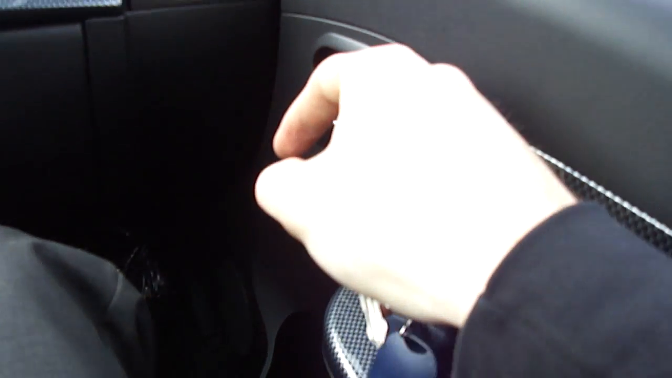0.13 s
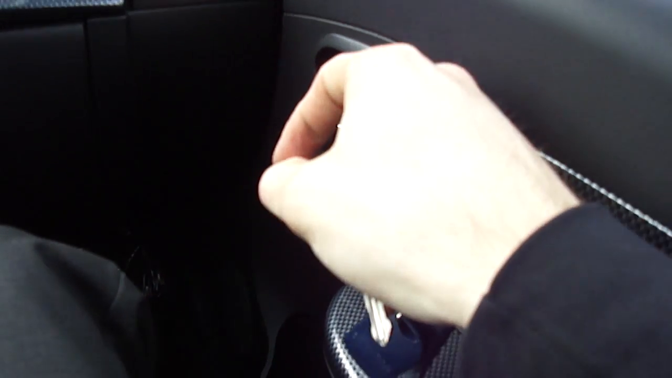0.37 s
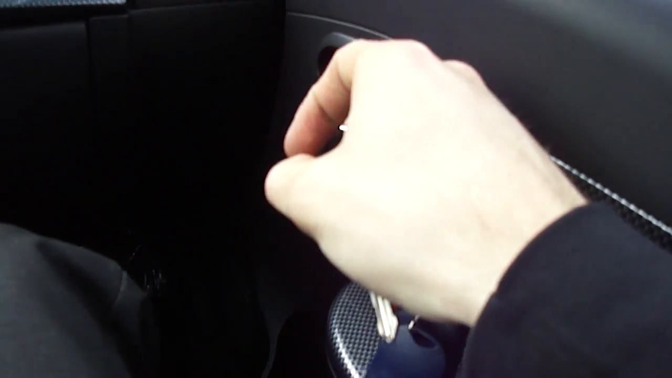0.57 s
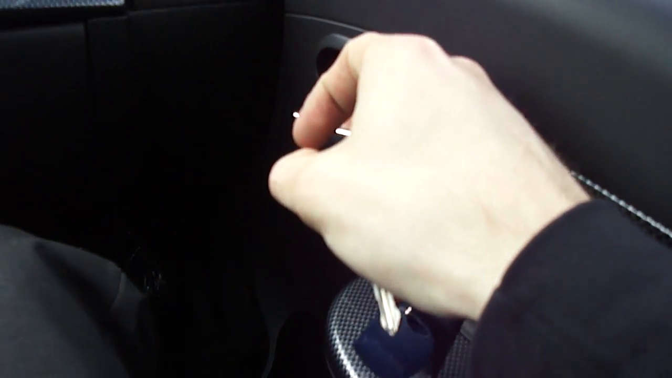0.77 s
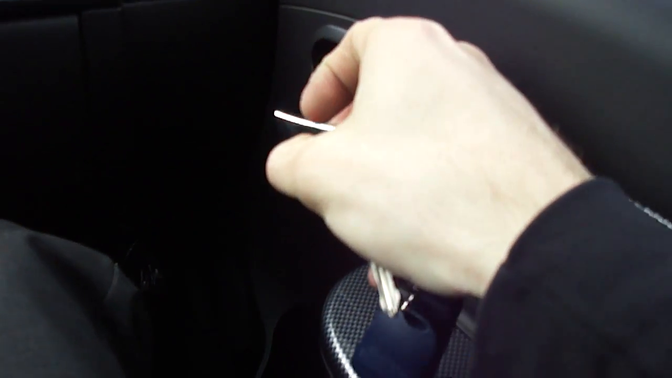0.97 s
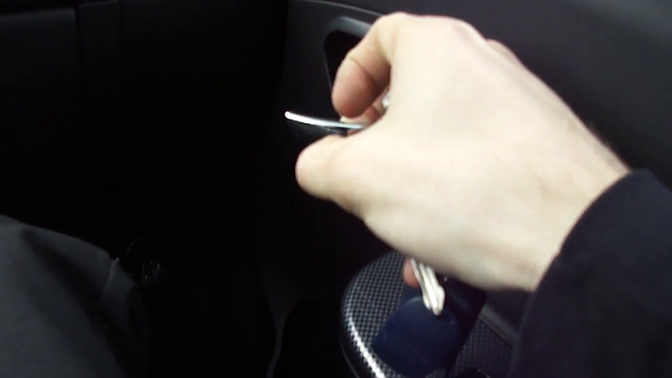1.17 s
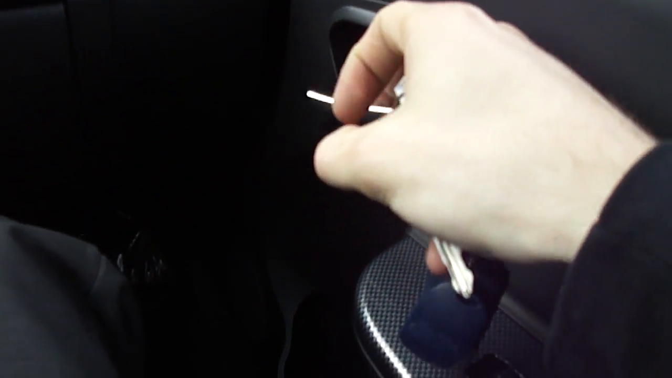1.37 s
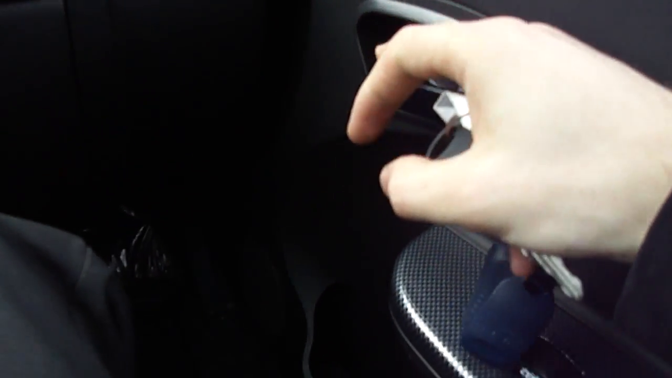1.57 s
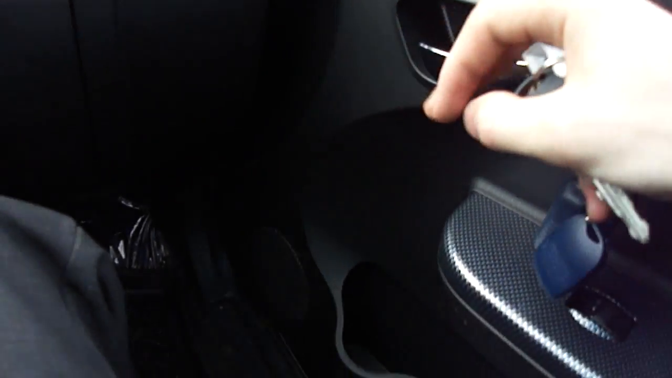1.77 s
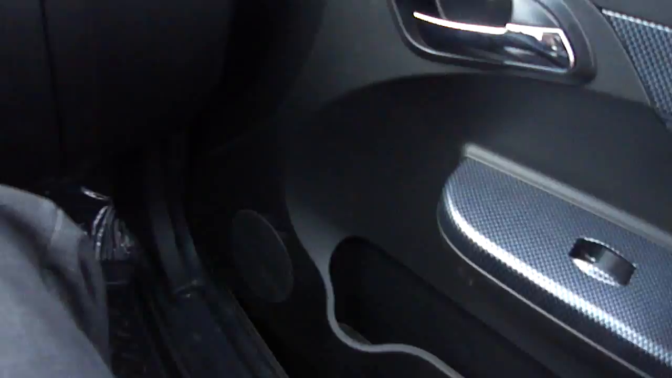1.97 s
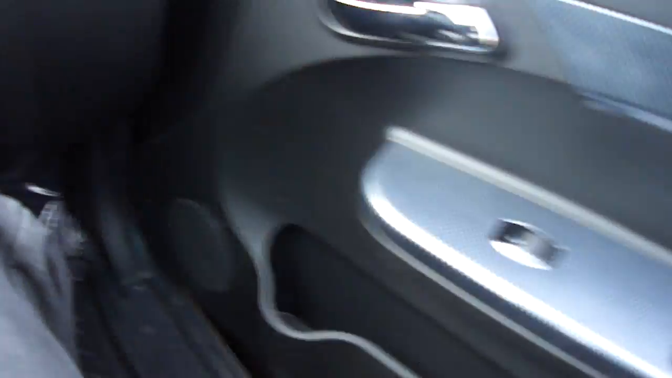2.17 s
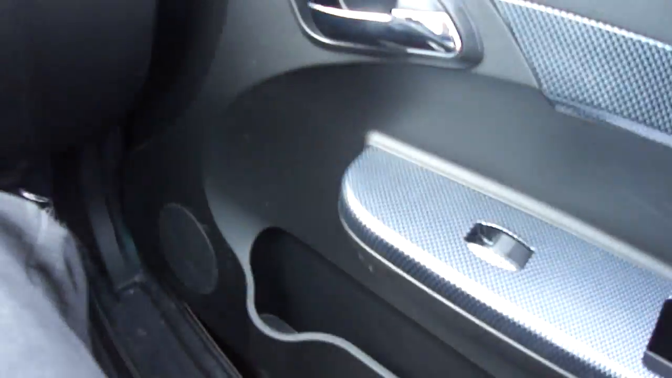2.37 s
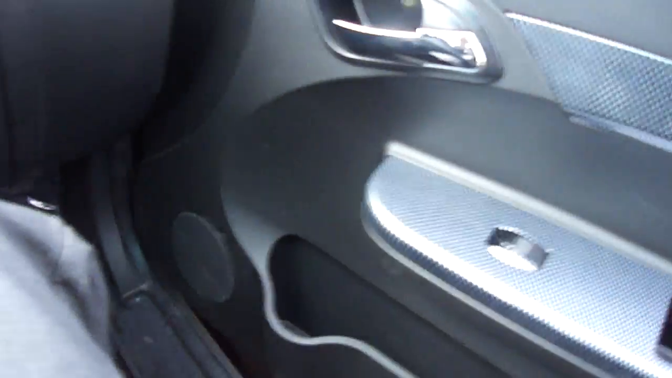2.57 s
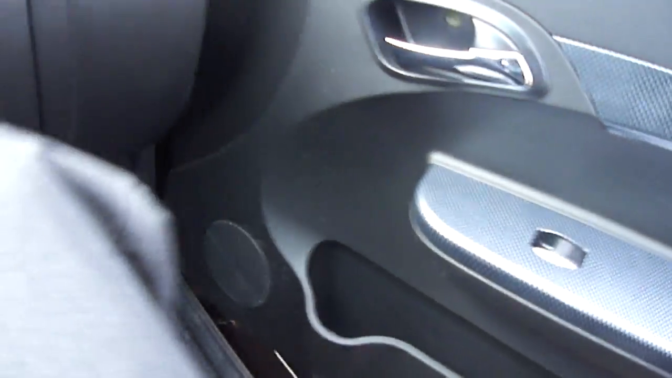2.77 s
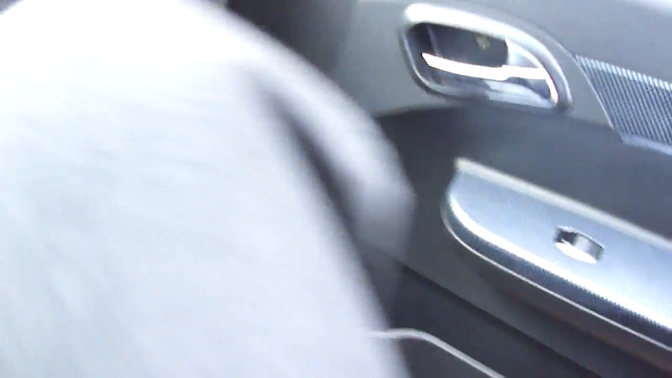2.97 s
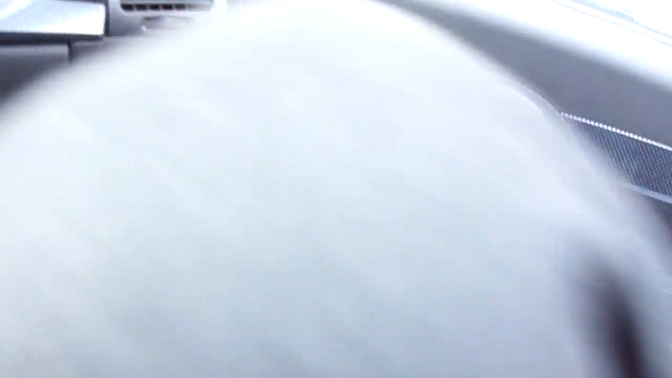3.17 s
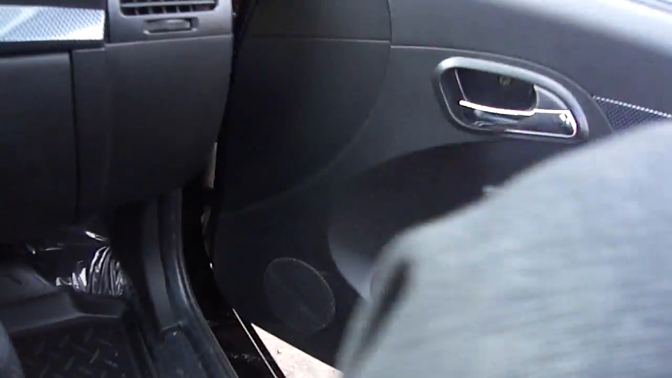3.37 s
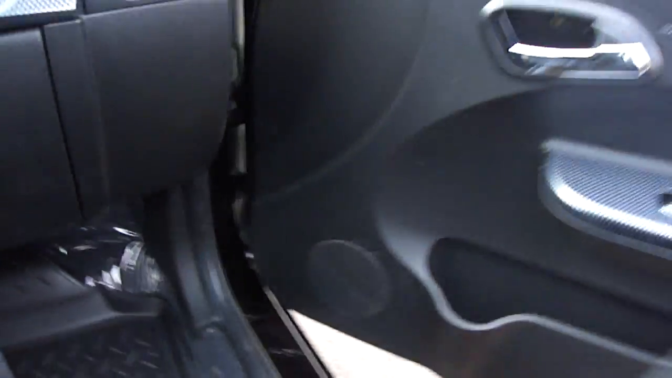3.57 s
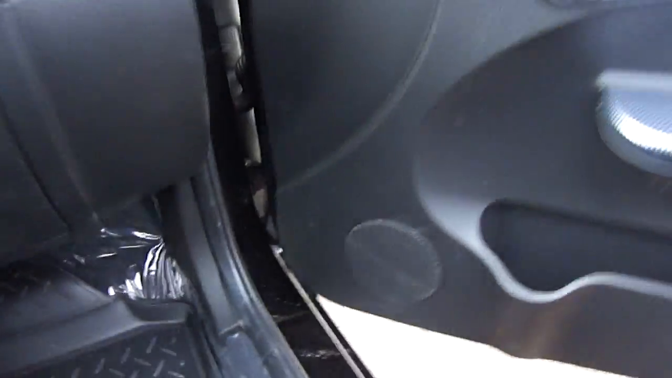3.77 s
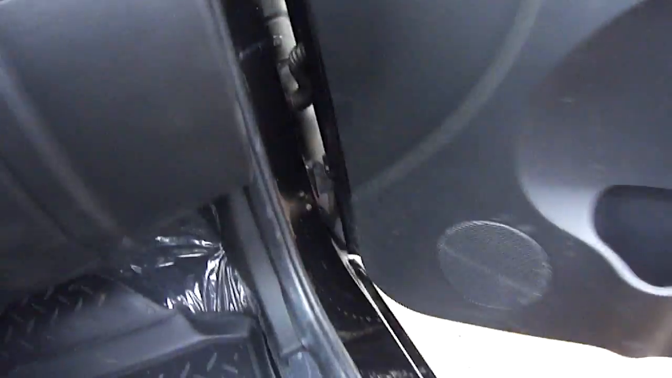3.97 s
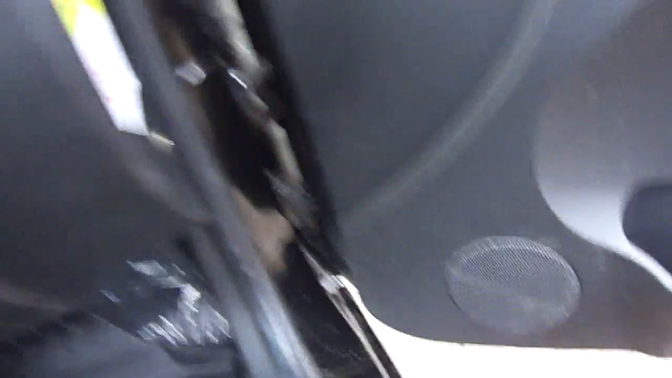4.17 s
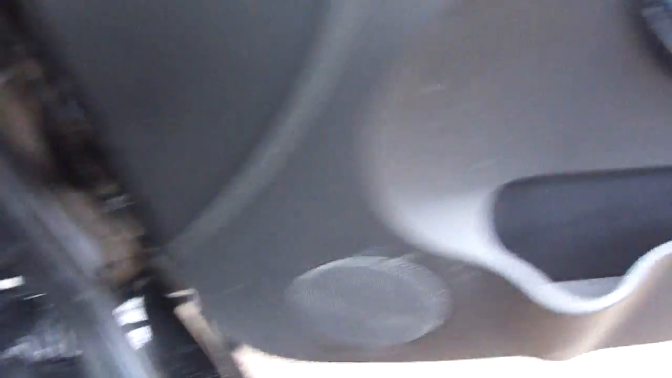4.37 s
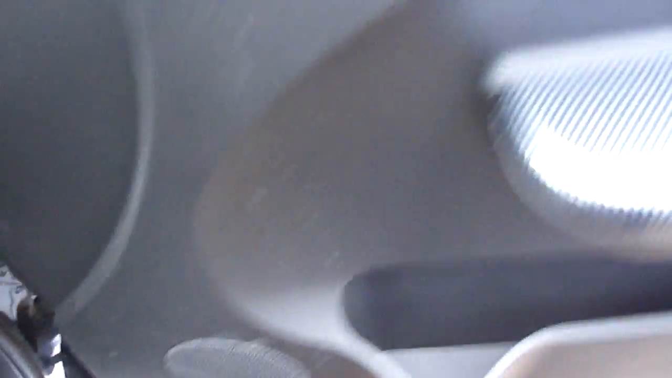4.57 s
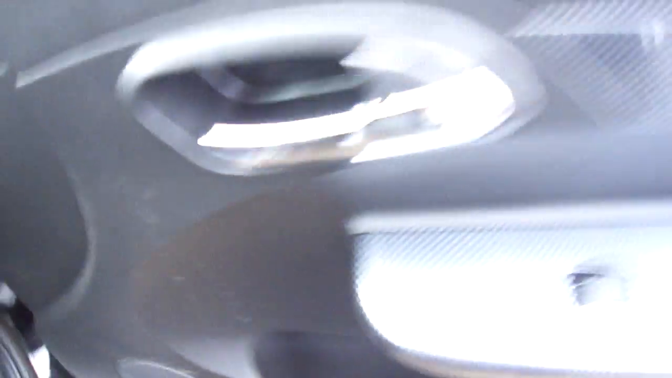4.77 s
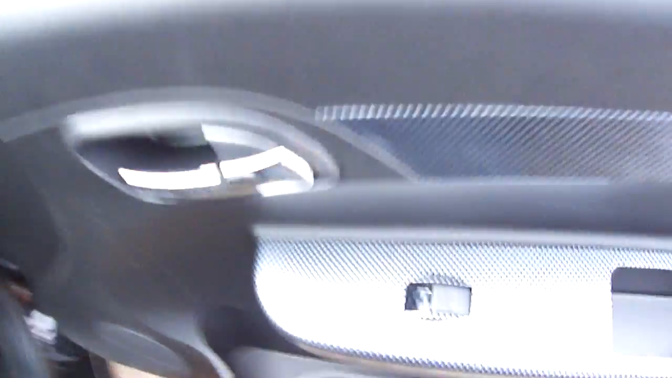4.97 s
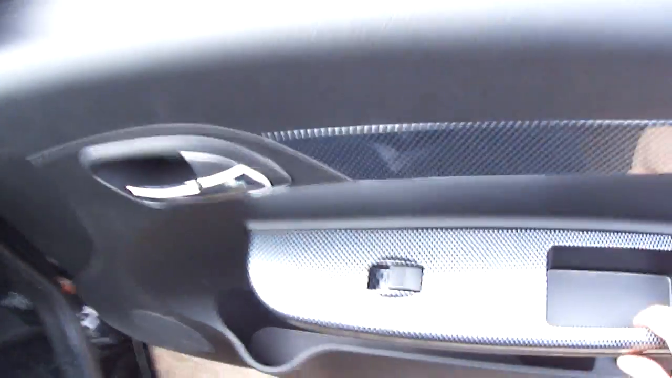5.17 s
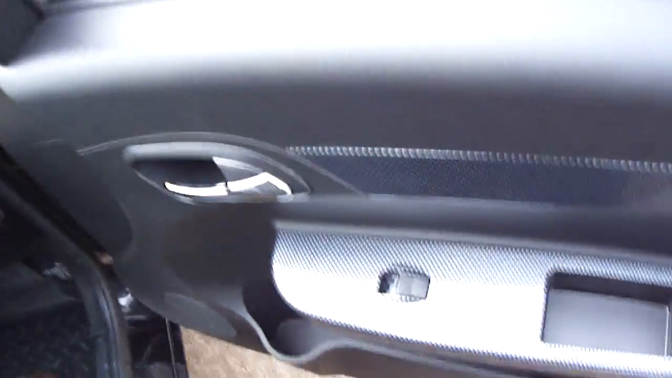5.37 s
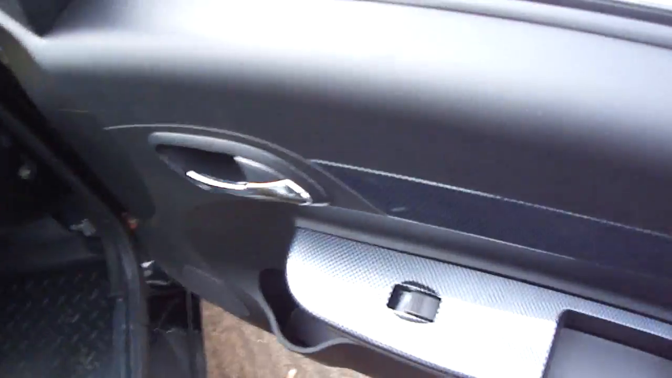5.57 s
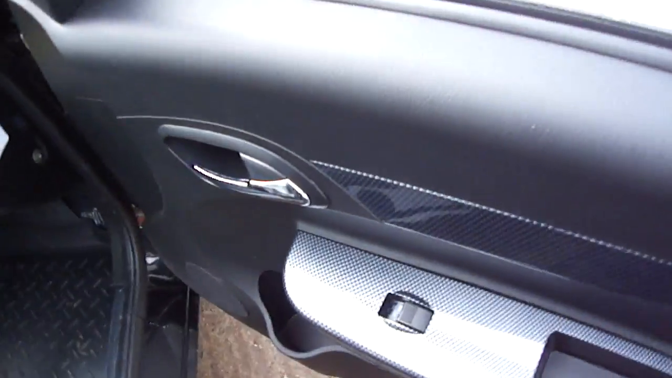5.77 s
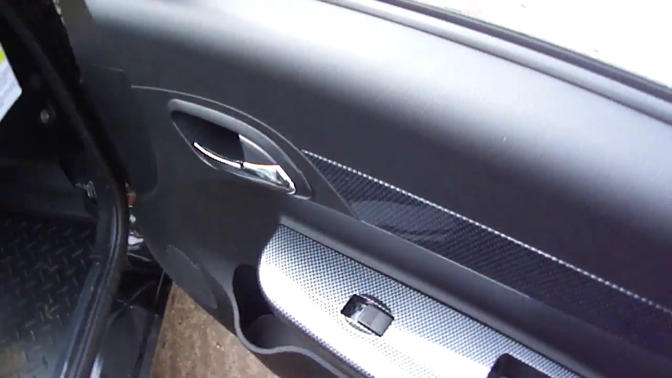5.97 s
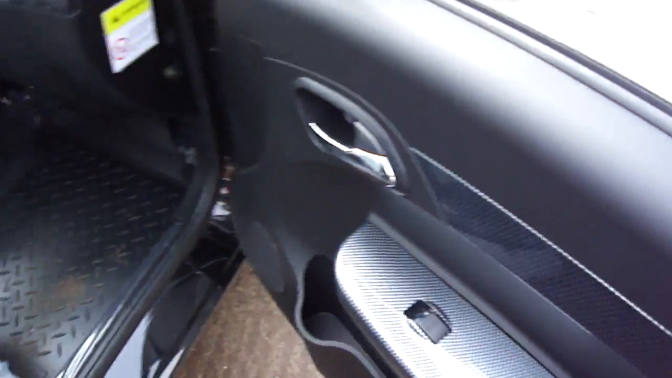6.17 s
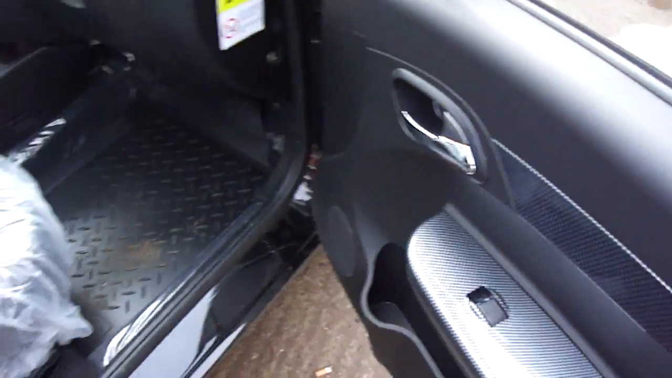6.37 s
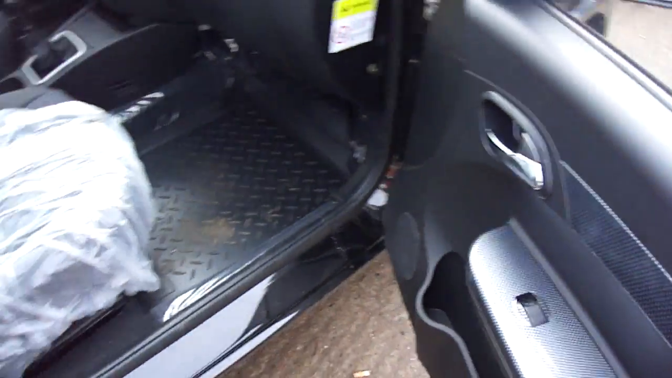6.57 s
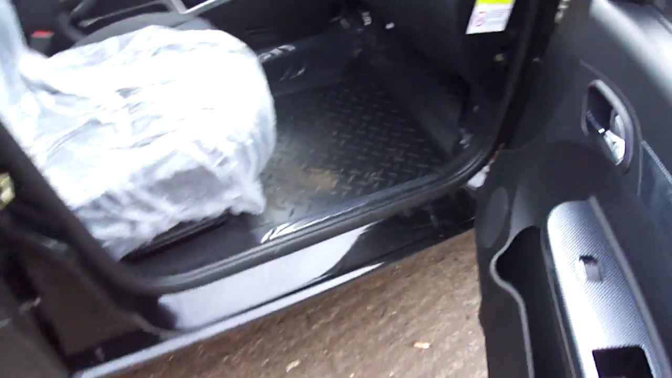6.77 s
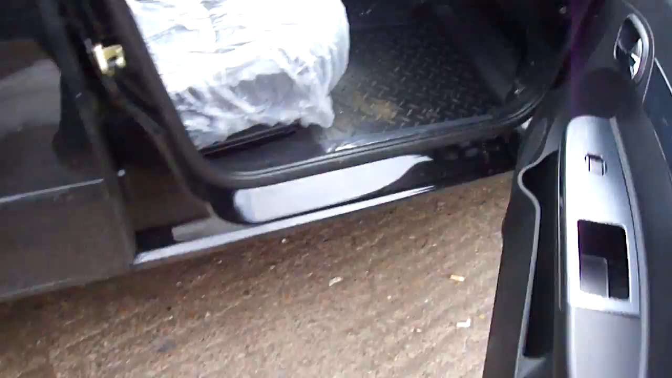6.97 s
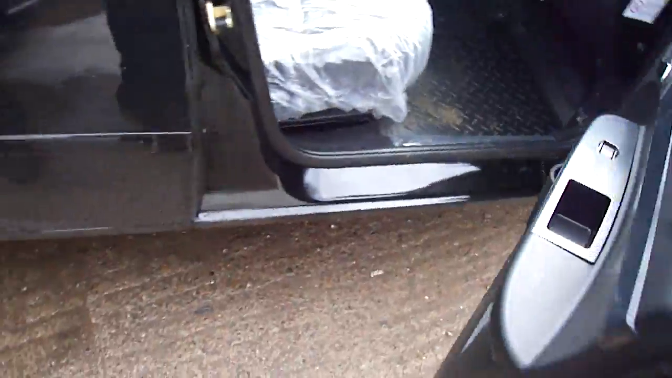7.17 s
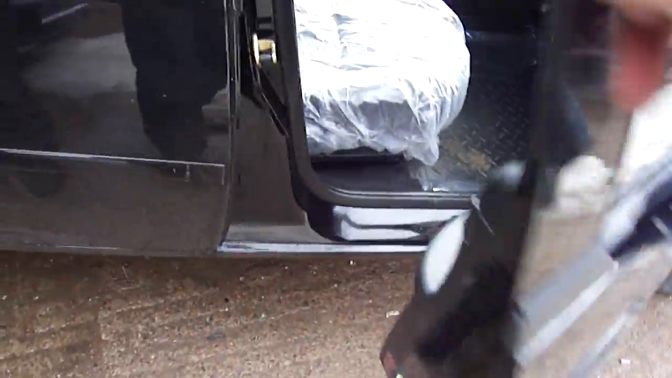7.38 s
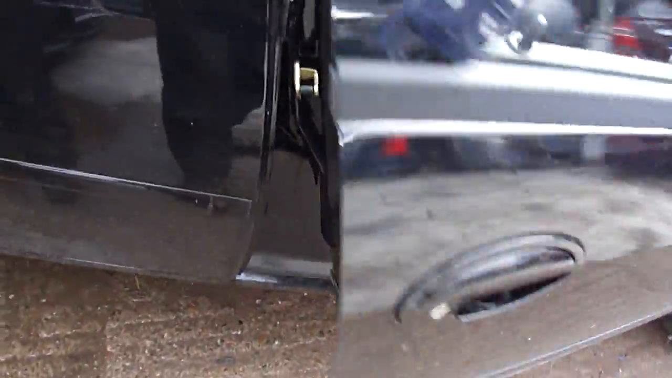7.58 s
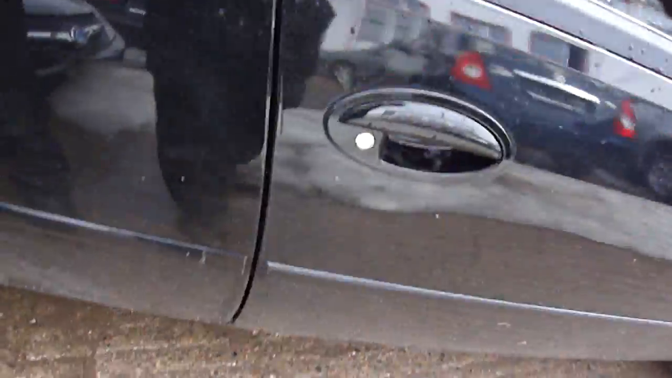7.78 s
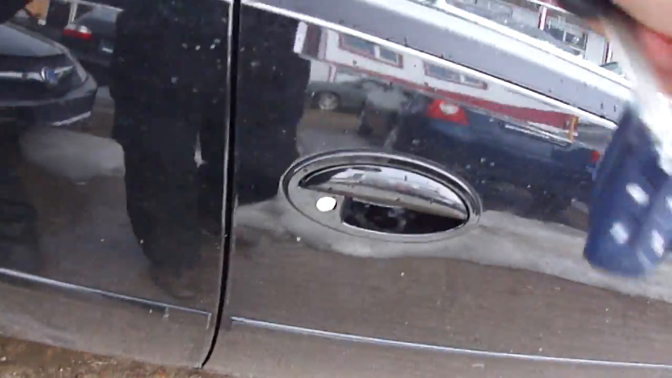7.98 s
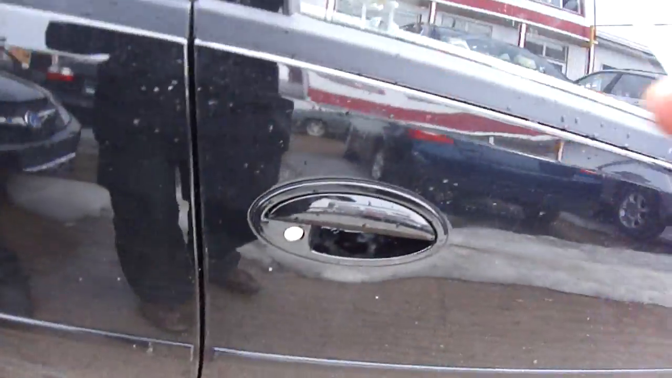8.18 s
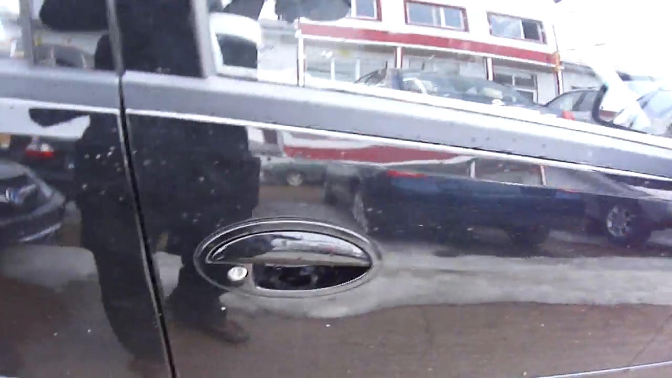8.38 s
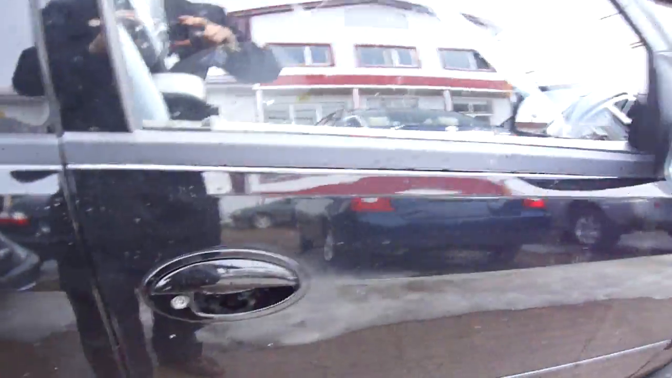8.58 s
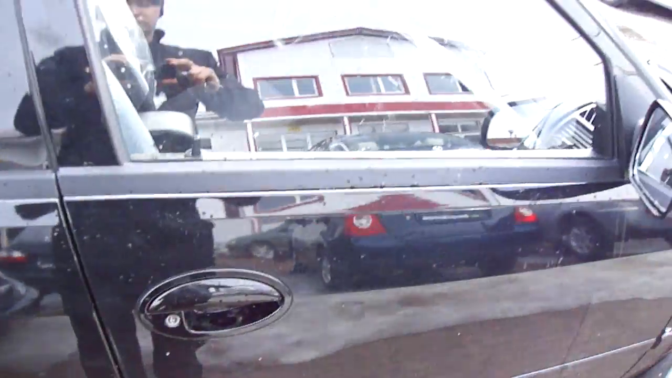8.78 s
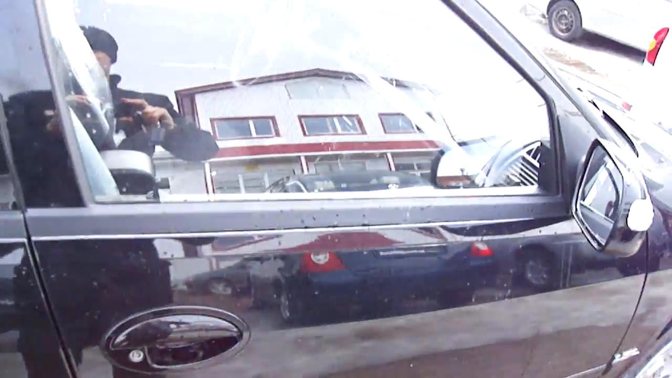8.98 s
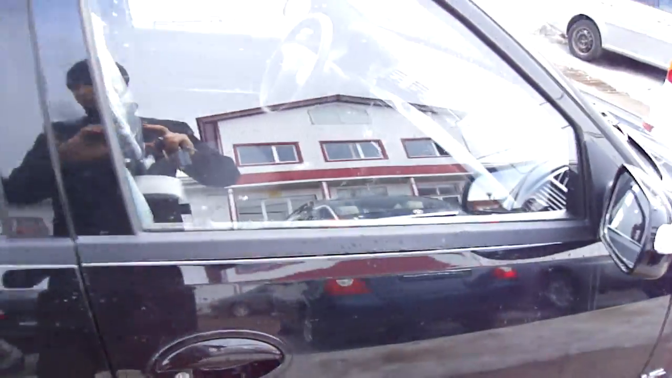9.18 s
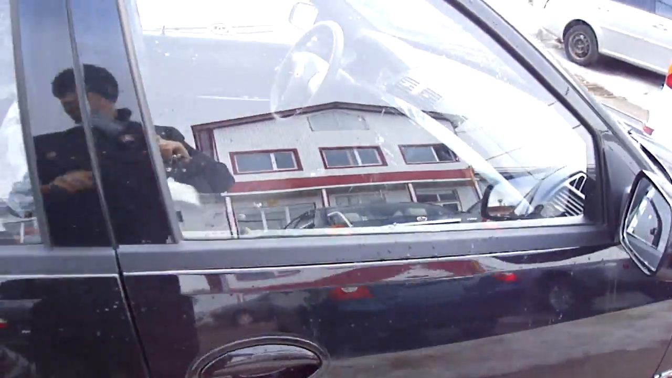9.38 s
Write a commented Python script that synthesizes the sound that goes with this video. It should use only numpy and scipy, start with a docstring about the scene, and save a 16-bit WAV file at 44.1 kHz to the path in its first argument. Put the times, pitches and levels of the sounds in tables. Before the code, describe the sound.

Loose handle rattles, sharp latch clunk and door knocks, close rustling cloth with ticking keys, then a heavy door slam and a few light clicks.

```python
"""Fingers nudge a car door's loose handle, then draw it in stick-slip steps: filtered strikes over cabin air.
The latch lets go and the door is pushed open: strikes through door and metal modes, booms, pings; yard air joins.
The person climbs out close to the microphone: cloth noise, rubs, squeaks and creaks; keys tick and shoes scuff.
The door is slammed and shudders on its seal; a few light clicks and rubs follow."""
import sys
import numpy as np
from scipy import signal
from scipy.fft import rfft, irfft
from scipy.io import wavfile
from scipy.ndimage import uniform_filter1d

SR = 44100
rng = np.random.default_rng(int(sys.argv[2]) if len(sys.argv) > 2 else 0)


def wav_out(sig):
    """Save sig, one row per channel (or a flat mono array), as 16-bit PCM at SR to the path in sys.argv[1]."""
    wavfile.write(sys.argv[1], SR, np.round(np.clip(np.atleast_2d(sig).T, -1, 1) * 32767).astype(np.int16))


N = 416304
TAPS = 16384
HZ = np.fft.rfftfreq(TAPS, 1 / SR)
AGE_S = np.arange(TAPS) / SR
TIME_S = np.arange(N) / SR
LEVEL_SPAN_S = 0.01  # strike levels: rms if all the energy fell within this span
EDGE_HZ = 11050

# Steady air, closed cabin and open yard: hz, relative_db (per Hz)
CABIN_AIR = [(18, -65), (30, -24), (370, -4.5), (756, -4), (835, -6), (1020, -4.5), (1620, -9), (2790, -12),
             (10800, -22), (14100, -35), (22000, -120)]
YARD_AIR = [(18, -64), (30, -29), (95, -6.5), (168, -10), (289, 0.5), (536, 1), (1150, 0), (2180, -8.5),
            (2720, -7.5), (10000, -19.5), (10800, -16), (14100, -49), (22000, -120)]
CABIN_DB, YARD_DB = -53, -45
OPEN_S, OPENING_S = 1.38, 0.74  # the door swings open and lets the yard in

# Long slides of clothes over seat and door, and a short burst of noise from the door's shell at the slam;
# levels before the surges: start_s, length_s (before release), rise_s, rub_db, hiss_db
SLIDES = [(0.0, 0.13, 0.0016, -50, -52.5), (1.077, 0.61, 0.24, -48, -55.5),
          (1.838, 0.53, 0.081, -47.5, -43), (2.313, 1.4, 0.29, -46, -42.5), (2.74, 0.56, 0.58, -33, -29.5),
          (3.3, 1.406, 0.11, -39, -34), (3.657, 0.34, 0.14, -35.5, -36), (4.006, 0.34, 0.07, -39.5, -32),
          (4.418, 0.22, 0.26, -34.5, -34), (4.714, 0.66, 0.4, -41, -41), (5.437, 0.26, 0.048, -47.5, -41.5),
          (5.85, 0.41, 0.091, -43, -45.5), (6.926, 1.6, 0.19, -52, -51.5), (7.812, 0.073, 0.033, -29, -39),
          (8.09, 0.26, 0.04, -52, -54), (8.843, 0.2, 0.051, -49, -52.5)]
RELEASE_S = 0.12
# Spectra of fabric rub, fabric hiss and weight-shift rumble: hz, relative_db (per Hz)
RUB_SPECTRUM = [(150, -28), (250, -12), (328, -3.5), (439, -2.5), (1070, 2), (1160, 3), (1690, -2.5),
                (1900, -5.5), (2200, -8), (2860, -5), (4840, -120)]
HISS_SPECTRUM = [(1000, -28), (1700, 1.5), (1980, -0.5), (3130, 5.5), (3580, 5.5), (4950, 5.5), (5820, 3),
                 (10000, 1), (10800, -0.5), (14100, -22), (22000, -120)]
RUMBLE_SPECTRUM = [(15, -52), (25, -58), (91, -6), (171, 0.5), (246, 5), (325, -8.5), (406, -7), (442, -12),
                   (560, 4), (700, -13), (910, -48), (1540, -120)]
SNAGS_PER_S, SNAG_DB = 260, -7.5  # seams and creases crackle; dB re nominal hiss
# level at that strength of rub; dB more for each dB of rub
RUMBLE_DB, RUMBLE_AT_RUB_DB, RUMBLE_FOLLOWS = -55, -40.5, 0.33

# Taps of the loose handle in its seat: start_s, level_db, treble_edge_hz
RATTLES = [(0.0342, -27, 9100), (0.0613, -27.5, 4500), (0.138, -40, 1700), (0.144, -42, 1700),
           (0.158, -31.5, 3000), (0.2905, -36, 3500), (0.304, -43, 1700), (0.313, -37, 8000),
           (0.3245, -41, 3000), (0.333, -48, 1700), (0.341, -47, 1700)]
# Modes of the handle: hz, level_db, t60_s
HANDLE_MODES = [(1000, 0.5, 0.035), (1120, 1.5, 0.0088), (2140, -7, 0.051), (3170, -8.5, 0.017),
                (3980, -7, 0.015), (4600, -13, 0.016), (6820, -26, 0.011), (7900, -13, 0.0094)]

# Keys, small plastic parts, snagging cloth and grit: start_s, body_db, tick_db, tick_hz, rattle_t60_s
CLICKS = [(0.088, -64, -35, 4000, 0.015), (0.172, -47, -34.5, 3680, 0.012), (0.77, -51, -42, 5700, 0.037),
          (1.073, -41, -44, 2500, 0.022), (1.194, -59, -43.5, 3160, 0.014), (1.558, -55, -41, 4240, 0.014),
          (1.598, -41, -36.5, 3750, 0.062), (1.638, -49, -40, 4200, 0.02), (1.703, -44, -29, 4640, 0.03),
          (1.736, -36, -39.5, 1710, 0.034), (2.012, -35, -30.5, 1900, 0.026),
          (2.026, -34, -35, 2200, 0.033), (2.238, -30, -22, 4630, 0.016), (2.267, -56, -37, 3700, 0.03),
          (2.294, -53, -33, 2700, 0.027), (2.305, -28.5, -39, 2960, 0.06), (2.317, -36, -29, 2780, 0.085),
          (2.517, -29.5, -30, 3140, 0.02), (3.137, -45, -37, 4770, 0.012), (3.327, -47, -23, 4670, 0.036),
          (3.472, -55, -30, 5550, 0.013), (3.52, -41, -30, 4300, 0.013), (3.614, -52, -32, 5530, 0.008),
          (4.191, -42, -26, 4400, 0.014), (4.202, -42, -26, 4600, 0.01), (4.221, -32, -32, 4470, 0.016),
          (4.235, -49, -26, 4580, 0.018), (4.444, -26.5, -21, 4160, 0.05), (4.704, -35, -24, 3820, 0.084),
          (4.779, -38.5, -27, 5070, 0.038), (4.858, -41, -32, 4800, 0.064),
          (5.5238, -23.5, -21, 4100, 0.021), (5.548, -29, -37, 2960, 0.026),
          (5.861, -32, -29.5, 3750, 0.084), (5.691, -46, -30.5, 3570, 0.031), (5.824, -49, -41, 5030, 0.02),
          (5.983, -39, -37, 3600, 0.035), (6.284, -60, -38, 7960, 0.012), (6.178, -33, -27.5, 4140, 0.054),
          (6.358, -27, -25, 4030, 0.05), (6.503, -58, -44, 5000, 0.02), (6.576, -48, -36.5, 3200, 0.062),
          (6.669, -38, -36, 2790, 0.053), (6.756, -55, -44, 2800, 0.03), (6.884, -46, -29.5, 5000, 0.041),
          (7.01, -54, -42.5, 4500, 0.012), (7.124, -43, -41, 3200, 0.021), (7.217, -62, -37, 7000, 0.028),
          (7.299, -55, -46, 2300, 0.02), (7.392, -52, -46, 2800, 0.02), (7.427, -45, -40, 3400, 0.046),
          (7.461, -36, -27.5, 3650, 0.085), (7.674, -40, -29.5, 3550, 0.06), (7.679, -38, -30, 3420, 0.059),
          (7.712, -46, -32.5, 3500, 0.023), (7.73, -39, -32, 2440, 0.03), (7.736, -36, -27, 2460, 0.12),
          (8.103, -46, -42.5, 4370, 0.013), (8.252, -50, -27.5, 7300, 0.054),
          (8.2543, -34, -30, 4500, 0.012), (8.325, -61, -35, 2150, 0.04), (8.366, -52, -36, 2800, 0.0085),
          (8.619, -49, -26, 6160, 0.022), (8.6244, -35, -24, 1830, 0.012),
          (8.7628, -40, -29.5, 1780, 0.0067), (8.7733, -40, -27, 1480, 0.025),
          (8.826, -41, -23.5, 3240, 0.0034), (8.979, -56, -37, 8200, 0.011), (8.989, -60, -36, 8000, 0.013),
          (9.14, -41, -36, 3820, 0.039)]
CLICK_BODY_HZ, TICK_OCTAVES = 1150, 1
LEAD_S, LEAD_DB = 0.0043, -16  # a faint short burst leads each tick; dB re tick
FULL_LEAD_T60_S = 0.025  # the burst is weaker for ticks with rattles shorter than this
TICK_TOP_RATIO = 4.8  # treble edge over tick pitch: a lower contact is also duller

# Blows on latch, door and sill: start_s, thud_db, panel_db, panel_hz, latch_db, rattle_t60_s
KNOCKS = [(0.153, -35.5, -36, 990, -37.5, 0.054), (1.0768, -23, -20.5, 990, -26, 0.019),
          (1.0798, -22.5, -26, 750, -18.5, 0.02), (1.095, -31, -24, 724, -31.5, 0.099),
          (1.13, -34, -30.5, 1110, -38.5, 0.18), (1.424, -41, -30, 620, -35.5, 0.046),
          (1.433, -33, -27, 675, -34.5, 0.52), (1.537, -46, -23, 725, -37, 0.05),
          (1.6465, -30.5, -22, 600, -30, 0.038), (1.666, -40.5, -27.5, 700, -34.5, 0.065),
          (1.864, -38, -29, 660, -49, 0.035), (1.947, -41, -31, 970, -26.5, 0.05),
          (2.172, -36, -25.5, 734, -33, 0.048), (2.1926, -38, -30, 880, -28, 0.11),
          (2.2305, -51, -25, 720, -23, 0.033), (2.3503, -39, -14, 930, -20.5, 0.011),
          (2.368, -41, -30, 745, -47, 0.081), (2.389, -51, -30.5, 820, -48, 0.028),
          (2.482, -40, -31.5, 930, -27, 0.024), (3.885, -31, -29.5, 1200, -29, 0.055),
          (4.277, -45, -29, 1290, -26, 0.24), (5.384, -24.5, -22.5, 670, -32.5, 0.0081),
          (5.393, -29, -30.5, 1400, -32.5, 0.014), (5.563, -46, -15, 980, -30.5, 0.0055),
          (5.5658, -35.5, -42, 1090, -34, 0.032), (6.046, -37.5, -28, 684, -33, 0.059),
          (7.839, -31, -16, 1290, -24, 0.067), (7.854, -33, -20, 710, -20.5, 0.078),
          (7.906, -36, -33, 1350, -36, 0.036), (9.161, -40, -28.5, 1090, -42, 0.0057)]
# Modes of the door and its trim: hz, level_db, t60_s
DOOR_MODES = [(123, 8, 0.16), (169.6, 3.5, 0.38), (218.3, 3, 0.4), (272, 7.5, 0.12), (399.4, 7, 0.087),
              (491, 8, 0.052), (616.3, 10, 0.071), (768, 1.5, 0.096), (882, 2.5, 0.1), (982, 1.5, 0.09),
              (1072, 2, 0.13), (1181, 5.5, 0.086), (1414, 8, 0.042), (1640, 7.5, 0.029)]
# Modes of latch and keys: hz, level_db, t60_s
METAL_MODES = [(2900, 1, 0.014), (2950, 10, 0.017), (3200, 13, 0.013), (4670, -13, 0.016), (5060, -23, .02),
               (6350, -21, .012), (7560, -14, .015)]
THUD_HZ, LATCH_HZ = 249, 2680

# Stick-slip steps of the drawn handle, alike but for strength: start_s, level_db
HANDLE_STEPS = [(0.648, -33.5), (0.766, -39.5), (0.852, -33), (0.959, -32), (0.982, -32), (1.003, -38.5)]
HANDLE_THUD_HZ, HANDLE_PANEL_HZ, HANDLE_T60_S = 177, 665, 0.075
SPRING_HZ, SPRING_T60_S = 2730, 0.048

# Shell and cabin air as the door is freed, swung, slammed and settles:
# start_s, peak_db, rise_s, t60_s (after the rise), centre_hz, lowest_hz
BOOMS = [(1.077, -24, 0.0033, 0.06, 100, 55), (1.086, -33, 0.018, 0.5, 110, 85),
         (1.3, -52, 0.08, 0.97, 170, 100), (1.537, -32, 0.0057, 0.17, 141, 90.5),
         (2.195, -27.5, 0.0039, 0.052, 130, 90), (7.392, -43, 0.036, 0.98, 154, 45),
         (7.497, -42, 0.014, 0.097, 150, 45), (7.63, -38, 0.0062, 0.12, 200, 45),
         (7.699, -38.5, 0.0062, 0.12, 130, 45), (7.826, -25, 0.03, 0.52, 480, 298),
         (7.85, -32.5, 0.061, 0.43, 120, 45), (8.01, -41, 0.049, 0.2, 380, 110)]
# Single parts (spring, keys, panels) ringing on: start_s, level_db (before the pair's weights), pitch_hz, t60_s
PINGS = [(1.0813, -11.5, 2840, 0.022), (1.081, -19, 266, 0.13), (1.083, -31, 592, 0.22),
         (1.081, -27, 1130, 0.11), (1.082, -36, 2540, 0.075), (1.102, -26, 274, 0.087),
         (1.132, -28, 1770, 0.05), (1.155, -28, 710, 0.05), (1.4327, -19, 2880, 0.034),
         (1.425, -23.5, 626, 0.17), (1.5397, -17.5, 2600, 0.022), (1.539, -29, 615, 0.064),
         (1.6485, -9, 575, 0.037), (1.649, -15, 627, 0.085), (1.65, -18, 884, 0.12),
         (1.65, -20.5, 1083, 0.1), (1.65, -28, 1212, 0.12), (1.949, -24, 1100, 0.04),
         (1.949, -27, 3150, 0.025), (2.013, -22.5, 1130, 0.068), (2.013, -28, 2200, 0.04),
         (2.196, -17, 130, 0.079), (2.232, -14.5, 615, 0.05), (2.351, -15, 803, 0.043),
         (2.351, -21, 1443, 0.045), (2.351, -30, 1700, 0.049), (2.481, -36, 1110, 0.04),
         (2.518, -23, 990, 0.034), (2.518, -21, 3500, 0.025), (5.3836, -16.5, 212, 0.076),
         (5.386, -22.5, 281, 0.095), (5.3838, -10.5, 700, 0.046), (5.564, -25, 635, 0.094),
         (5.564, -41, 861, 0.055), (5.564, -25, 2676, 0.028), (5.862, -27.5, 818, 0.13),
         (5.524, -19, 3260, 0.025), (6.357, -34, 1420, 0.037), (6.359, -28, 3160, 0.028),
         (8.625, -16, 1290, 0.018), (8.625, -25, 2450, 0.02), (7.84, -16, 1390, 0.05),
         (7.84, -18, 1620, 0.043), (7.857, -22, 488, 0.16), (7.857, -30, 391, 0.18), (7.865, -32, 78, 0.26),
         (7.9, -20, 333, 0.15), (7.924, -16, 222, 0.095), (8.2528, -9.5, 4600, 0.016),
         (8.2545, -12, 7450, 0.014), (8.2545, -22, 2800, 0.025), (8.8262, -8, 2650, 0.024),
         (8.8257, -5, 3940, 0.0047), (8.8268, -14, 5000, 0.005), (8.979, -33, 2640, 0.04),
         (9.131, -33, 2630, 0.055)]

# Surfaces that stick and slip at one gliding pitch: start_s, length_s, level_db, first_hz, last_hz
SQUEAKS = [(1.205, 0.142, -51, 1100, 1260), (1.386, 0.13, -45, 2850, 2820), (2.315, 0.01, -25, 3010, 2900),
           (4.087, 0.043, -25.5, 3310, 2930), (4.1, 0.021, -29.5, 2630, 2330),
           (4.134, 0.062, -34, 3180, 3350), (4.187, 0.047, -34, 2490, 2520)]
SQUEAK_LOWPASS_HZ = 135  # before the shift to pitch

# Short rubs of sleeve and shoe: start_s, length_s, body_db, hiss_db, hiss_low_hz, hiss_high_hz
SCUFFS = [(1.282, 0.032, -42, -49.5, 1410, 4500), (2.234, 0.13, -67, -40.5, 2000, 11000),
          (3.166, 0.078, -40.5, -30, 1970, 11000), (3.953, 0.049, -37.5, -37, 2000, 7000),
          (4.142, 0.066, -48, -33.5, 2380, 6460), (5.19, 0.055, -38.5, -35.5, 2210, 11400),
          (5.488, 0.047, -40, -33, 2480, 8200), (5.579, 0.025, -43, -36.5, 2300, 7000),
          (5.618, 0.041, -66, -33, 2880, 10600), (5.662, 0.053, -69, -38.5, 2580, 5730),
          (5.915, 0.081, -49, -46, 2200, 10000), (6.626, 0.035, -55, -44.5, 2600, 7300),
          (7.131, 0.04, -48, -41, 4540, 9450), (7.751, 0.031, -33.5, -42, 1470, 4000),
          (7.832, 0.054, -30, -27.5, 3400, 10800), (8.207, 0.047, -44, -47, 1620, 6000),
          (8.581, 0.047, -43, -41, 2180, 8750), (8.676, 0.062, -43, -38, 2500, 10300),
          (8.744, 0.02, -49, -42, 1510, 3340), (9.358, 0.076, -51.5, -49, 2000, 7000)]
SCUFF_HZ, SCUFF_OCTAVES = 3300, 12  # centre and width of the hiss

# Shoes and jacket creaking as the weight shifts: start_s, length_s, level_db, first_hz, last_hz
CREAKS = [(1.349, 0.02, -47, 1100, 1050), (5.931, 0.02, -43, 2470, 2800), (6.638, 0.013, -38.5, 2300, 2200),
          (6.669, 0.012, -43, 2760, 2700), (6.785, 0.013, -35, 2900, 2850), (6.806, 0.02, -36, 2830, 2900),
          (7.024, 0.023, -35.5, 1750, 1950), (7.265, 0.013, -40, 1320, 1900),
          (7.753, 0.024, -31.5, 1390, 1300), (7.764, 0.013, -29, 3320, 3200),
          (8.15, 0.0069, -35.5, 1550, 1550), (8.185, 0.008, -41, 1640, 1620),
          (8.283, 0.006, -37, 1700, 1700), (8.347, 0.016, -39, 2300, 2700),
          (8.423, 0.0086, -37, 1900, 1900), (8.763, 0.014, -33, 2480, 2300),
          (9.025, 0.024, -37.5, 1820, 1400)]
# Resonances of a creak: pitch_multiple, level_db
CREAK_MODES = [(0.6, -17), (0.87, -9), (1, 3.5), (1.29, -4.5), (1.72, -13), (2.5, -16), (3.3, -18)]
SLIP_GAP_S, SLIP_T60_S = 0.0036, 0.013  # gap is the median
SLIP_SPREAD_DB, SLIP_DETUNE = 3.5, 0.075  # standard deviations; detune as a fraction of pitch

# The slammed door shudders against its seal, weaker each time
SHUDDER_S, SHUDDER_GAP_S, SHUDDER_DB, SHUDDER_STEP_DB = 7.925, 0.025, -25.5, -1


def amp(db):
    """Decibels to gain."""
    return 10 ** (np.asarray(db) / 20)


def evened(x):
    """Scales to rms 1."""
    return x / np.sqrt(np.mean(x ** 2) + 1e-20)


def add(mix, start_s, sound):
    """Mixes a sound in at a time, cut at the end of the mix."""
    part = mix[max(round(start_s * SR), 0):][:len(sound)]
    part += sound[:len(part)]


def ramp(start_s, length_s):
    """A smooth step from 0 to 1."""
    return np.sin(np.pi / 2 * np.clip((TIME_S - start_s) / length_s, 0, 1)) ** 2


def decay(age_s, t60_s):
    """Exponential fall by 60 dB in t60_s."""
    return np.exp(-np.log(1000) * age_s / t60_s)


def read(points):
    """A short spectrum as gain at every frequency, interpolated over log frequency."""
    hz, db = np.transpose(points)
    return amp(np.interp(np.log(HZ + 1), np.log(hz + 1), db))


def hump(centre_hz, octaves):
    """A broad rise round one frequency, at half gain `octaves` away."""
    return 1 / (1 + (np.log2((HZ + 1) / centre_hz) / octaves) ** 2)


def band(low_hz, high_hz, order=3):
    """Gain of a band-pass."""
    low_cut = 1 + (low_hz / (HZ + 1)) ** (2 * order)
    high_cut = 1 + (HZ / high_hz) ** (2 * order)
    return 1 / np.sqrt(low_cut * high_cut)


def ringing(modes, between_db):
    """Gain of a body: its modes stand over a bed of heavily damped ones."""
    power = amp(between_db) ** 2
    for hz, db, t60_s in modes:
        power = power + amp(db) ** 2 / (1 + (2 * np.pi * (HZ - hz) * t60_s / np.log(1000)) ** 2)
    return np.sqrt(power)


def own_modes(count, t60_s, between_db):
    """Every small part has a few resonances of its own, scattered over the treble."""
    pitches_hz = np.exp(rng.uniform(np.log(1500), np.log(10000), count))
    return ringing([(hz, 0, t60_s) for hz in pitches_hz], between_db)


def colour(x, gain):
    """Minimum-phase filter: resonances ring after the blow, never before."""
    cepstrum = irfft(np.log(np.maximum(gain / gain.max(), 1e-5)))
    cepstrum[1:TAPS // 2] *= 2
    cepstrum[TAPS // 2 + 1:] = 0
    response = irfft(np.exp(rfft(cepstrum)))
    return signal.fftconvolve(x, response)[:len(x)]


def wander(size, rate_hz):
    """Random line of rms 1, joining random values drawn at rate_hz."""
    knots = rng.standard_normal(int(size / SR * rate_hz) + 3)
    return evened(np.interp(np.arange(size) / SR * rate_hz, np.arange(len(knots)), knots))


def grains(size, per_s, spread_db):
    """Tiny slips at random moments, a few much larger than the rest."""
    chance = rng.random(size)
    strength = rng.exponential(1, size)
    sign = rng.choice([-1, 1], size)
    return evened((chance < per_s / SR) * sign * amp(spread_db * np.minimum(strength, 4)))


def strike(db, gain, t60_s, rattle, bite_s):
    """One hard contact, seating over bite_s, and the dense rattle that dies after it, heard through a body."""
    force = rng.standard_normal(TAPS) * decay(AGE_S, max(t60_s, 1e-3)) * (1 - np.exp(-AGE_S / bite_s))
    force *= amp(6.5 * np.minimum(AGE_S / 0.022, 1) * wander(TAPS, rate_hz=460))  # loose parts bounce in clumps
    force *= rattle / np.linalg.norm(force)
    force[round(bite_s * SR)] += 1
    # flatten the contact's spectrum, so that the body alone gives the colour
    uneven = np.sqrt(uniform_filter1d(abs(rfft(force)) ** 2, size=61) + 1e-3)
    sound = colour(force, gain / uneven)
    return amp(db) * sound * np.sqrt(LEVEL_SPAN_S * SR) / np.linalg.norm(sound)


def blow(thud_db, thud_hz, panel_db, panel_hz, latch_db, t60_s):
    """A blow shakes the whole door, rings its trim panel and rattles the latch."""
    door = ringing(DOOR_MODES, between_db=2.5)
    metal = ringing(METAL_MODES, between_db=14.0)
    door_t60_s = t60_s + 0.062  # the heavy door outlasts the light parts on it
    thud_body = door * band(0.57 * thud_hz, 1.73 * thud_hz, order=6)
    panel_body = door * hump(panel_hz, octaves=0.55) * band(480, 1790, order=5)
    latch_body = metal * hump(LATCH_HZ, octaves=1.0) * band(730, 20000)
    thud = strike(thud_db, thud_body, door_t60_s, rattle=1.0, bite_s=0.0015)
    panel = strike(panel_db, panel_body, t60_s, rattle=0.96, bite_s=0.00062)
    latch = strike(latch_db, latch_body, t60_s, rattle=8.4, bite_s=0.0008)
    return thud + panel + latch


def air(opening):
    """The hush of the cabin, joined by the gently wavering yard as the door opens."""
    inside = amp(CABIN_DB) * evened(colour(rng.standard_normal(N), read(CABIN_AIR)))
    yard = evened(colour(rng.standard_normal(N), read(YARD_AIR)))
    yard *= amp(YARD_DB + 0.35 * wander(N, rate_hz=12))
    return inside + opening * yard


def cabin(x, t60_s, wet_db):
    """Short, dull reflections from the door and the upholstered cabin, as decaying noise taps."""
    taps = rng.standard_normal(TAPS) * decay(AGE_S, t60_s) * (AGE_S > 0.004)
    taps = colour(taps, band(60, 2300, order=1))
    return x + amp(wet_db) * signal.fftconvolve(x, taps / np.linalg.norm(taps))[:N]


def sliding():
    """Strength of rub and hiss: each row swells and stops smoothly; overlaps add in power."""
    rub, hiss = np.zeros(N), np.zeros(N)
    for start_s, length_s, rise_s, rub_db, hiss_db in SLIDES:
        swell = ramp(start_s, rise_s) * (1 - ramp(start_s + length_s, RELEASE_S))
        rub += (amp(rub_db) * swell) ** 2
        hiss += (amp(hiss_db) * swell) ** 2
    return np.sqrt(rub), np.sqrt(hiss)


def folds(x, patchy_db):
    """Shifting folds of fabric favour now one stretch of the spectrum, now another."""
    spectra = signal.stft(x, nperseg=512)[2]
    patches = uniform_filter1d(rng.standard_normal(spectra.shape), size=7, axis=0)
    patches = uniform_filter1d(patches, size=6, axis=1)
    return signal.istft(spectra * amp(patchy_db * evened(patches)))[1][:len(x)]


def cloth(rub_gain, hiss_gain):
    """Fabric slides: a soft rub and a hiss of catching threads, both surging with the uneven pressure."""
    pressure = wander(N, rate_hz=45)
    rub_slips = rng.standard_normal(N) + 0.75 * grains(N, per_s=500, spread_db=1.0)
    rub = evened(colour(rub_slips, read(RUB_SPECTRUM)))
    rub *= rub_gain * amp(1.06 * pressure)
    thread_slips = rng.standard_normal(N) + 0.69 * grains(N, per_s=1800, spread_db=1.0)
    hiss = evened(colour(thread_slips, read(HISS_SPECTRUM)))
    hiss *= 0.85 * hiss_gain * amp(0.79 * pressure + 2.13 * wander(N, rate_hz=200))
    snags = evened(colour(grains(N, per_s=SNAGS_PER_S, spread_db=1.5), read(HISS_SPECTRUM)))
    return folds(rub + hiss + amp(SNAG_DB) * hiss_gain * snags, patchy_db=2.03)


def clothing_ticks(hiss_gain, count):
    """Faint stray ticks of clothing at `count` pitches follow the movement, each with a short noise tail."""
    ticks = np.zeros(N)
    for hz in np.geomspace(1700, 7500, count):
        ticks += colour(grains(N, per_s=14, spread_db=4.5), hump(hz, octaves=0.53) * band(1100, 18000))
    crumble = rng.standard_normal(TAPS) * decay(AGE_S, 0.014)
    return amp(-10.5) * hiss_gain * evened(signal.fftconvolve(ticks, crumble)[:N])


def rumble(rub_gain):
    """Low lumpy noise of a body shifting its weight."""
    weight = amp(RUMBLE_DB) * (rub_gain / amp(RUMBLE_AT_RUB_DB)) ** RUMBLE_FOLLOWS
    lumps = amp(2.5 * wander(N, rate_hz=12))
    return weight * lumps * evened(colour(rng.standard_normal(N), read(RUMBLE_SPECTRUM)))


def rattles():
    """The nudged plastic handle ticks against its seat, ringing its modes up to each tap's treble edge."""
    out, lever = np.zeros(N), ringing(HANDLE_MODES, between_db=-23.5)
    for start_s, db, top_hz in RATTLES:
        add(out, start_s, strike(db, lever * band(660, top_hz), t60_s=0.025, rattle=0.76, bite_s=0.0004))
    return out


def clicks():
    """Light parts meet: a short dull tap under a bright tick, led by a faint short burst."""
    out, metal = np.zeros(N), ringing(METAL_MODES, between_db=11.0)
    body = hump(CLICK_BODY_HZ, octaves=0.74) * band(330, 1760, order=4)
    for start_s, body_db, tick_db, tick_hz, t60_s in CLICKS:
        add(out, start_s, strike(body_db, body, t60_s, rattle=1.54, bite_s=0.00052))
        tick = metal * hump(tick_hz, TICK_OCTAVES) * band(0.62 * tick_hz, TICK_TOP_RATIO * tick_hz, order=5)
        tick = tick * own_modes(count=14, t60_s=0.016, between_db=-6.5)
        lead_gain = min(t60_s / FULL_LEAD_T60_S, 1)
        lead = strike(tick_db + LEAD_DB, tick, t60_s=0.014, rattle=3.3, bite_s=0.0015)
        add(out, start_s - LEAD_S, lead_gain * lead)
        add(out, start_s, strike(tick_db, tick, t60_s, rattle=1.85, bite_s=0.0004))
    return out


def knocks():
    """Blows as the latch lets go and the door is pushed, bumped and slammed: thud, panel and latch."""
    out = np.zeros(N)
    for start_s, thud_db, panel_db, panel_hz, latch_db, t60_s in KNOCKS:
        add(out, start_s, blow(thud_db, THUD_HZ, panel_db, panel_hz, latch_db, t60_s))
    return out


def handle():
    """Each slip of the handle bumps the door softly and rings the return spring."""
    out = np.zeros(N)
    spring = hump(SPRING_HZ, octaves=0.086) * band(2100, 3600)
    for start_s, db in HANDLE_STEPS:
        add(out, start_s, blow(db, HANDLE_THUD_HZ, db - 5, HANDLE_PANEL_HZ, db - 11.0, HANDLE_T60_S))
        add(out, start_s, strike(db - 8.5, spring, SPRING_T60_S, rattle=1.8, bite_s=0.00063))
    return out


def booms():
    """The steel shell and the air of the cabin swell after a push, then die away."""
    out, age_s = np.zeros(N), TIME_S[:SR]
    for start_s, db, rise_s, t60_s, hz, lowest_hz in BOOMS:
        swell = np.minimum(age_s / rise_s, 1) ** 0.29 * decay(np.maximum(age_s - rise_s, 0), t60_s)
        body = ringing(DOOR_MODES, between_db=7.0) * hump(hz, octaves=1.28) * band(lowest_hz, 670, order=5)
        shell = colour(rng.standard_normal(SR) * swell, body)
        add(out, start_s, amp(db) * shell * np.linalg.norm(swell) / np.linalg.norm(shell))
    return out


def ping(db, hz, t60_s):
    """A close pair of modes in one part, beating as they die."""
    split = 1.025
    turn = 2 * np.pi * hz * AGE_S
    turn += 0.15 * wander(TAPS, rate_hz=210)  # the part sits loosely and buzzes
    pair = 0.69 * np.sin(turn) + 0.26 * np.sin(split * turn)
    return colour(amp(db - 60 * AGE_S / t60_s) * pair, band(0.6 * hz, 20000, order=5))


def pings():
    """Struck parts ring on, each at one pitch."""
    out = np.zeros(N)
    for start_s, db, hz, t60_s in PINGS:
        add(out, start_s, ping(db, hz, t60_s))
    return out


def squeaks():
    """Quick slips, as noise, feed one narrow resonance that glides."""
    out = np.zeros(N)
    lowpass = signal.butter(2, SQUEAK_LOWPASS_HZ, fs=SR, output="sos")
    for start_s, length_s, db, first_hz, last_hz in SQUEAKS:
        size = int(max(length_s, 0.005) * SR)
        slips = rng.standard_normal(size) + 1j * rng.standard_normal(size)
        ring = signal.sosfilt(lowpass, slips)
        turn = np.exp(2j * np.pi * np.cumsum(np.linspace(first_hz, last_hz, size)) / SR)
        squeak = (ring * turn).real * signal.windows.tukey(size, 0.5)
        add(out, start_s, amp(db) * evened(squeak))
    return out


def scuffs():
    """Short rubs: a crowd of small slips that swells and stops."""
    out = np.zeros(N)
    body_gain = hump(1400, octaves=0.96) * band(320, 1550)
    for start_s, length_s, body_db, hiss_db, low_hz, high_hz in SCUFFS:
        size = int(max(length_s, 0.01) * SR)
        stroke = signal.windows.tukey(size, 0.6) * amp(3.9 * wander(size, rate_hz=186.4))
        slips = grains(size, per_s=2200, spread_db=1.5) * stroke
        slips = np.pad(slips, (0, size))  # room to ring out; levels are rms over stroke and tail
        hiss_gain = hump(SCUFF_HZ, SCUFF_OCTAVES) * band(low_hz, high_hz, order=6)
        body = evened(colour(slips, body_gain))
        hiss = evened(colour(slips, hiss_gain))
        add(out, start_s, amp(body_db) * body + amp(hiss_db) * hiss)
    return out


def creaks(count):
    """Up to `count` uneven slips in quick succession ring the same resonances, their pitch gliding."""
    out, age_s = np.zeros(N), AGE_S[:TAPS // 8]
    for start_s, length_s, db, first_hz, last_hz in CREAKS:
        sound, at_s = np.zeros(TAPS), 0
        for gap, size, detune in rng.standard_normal((count, 3)):
            if at_s < length_s:
                glide_hz = first_hz + (last_hz - first_hz) * at_s / length_s
                hz = glide_hz * (1 + SLIP_DETUNE * detune)
                ring = sum(amp(mode_db) * np.sin(2 * np.pi * k * hz * age_s) for k, mode_db in CREAK_MODES)
                add(sound, at_s, ring * amp(SLIP_SPREAD_DB * size - 60 * age_s / SLIP_T60_S))
            at_s += SLIP_GAP_S * np.exp(0.4 * gap)
        add(out, start_s, amp(db) * sound * np.sqrt(length_s * SR) / np.linalg.norm(sound))
    return out


def shudder(count):
    """Evenly spaced dull rebounds after the slam, each a weaker blow."""
    out = np.zeros(N)
    for k in range(count):
        db = SHUDDER_DB + k * SHUDDER_STEP_DB
        rebound = blow(db, THUD_HZ, db - 2.5, panel_hz=626, latch_db=db - 8.0, t60_s=0.041)
        add(out, SHUDDER_S + k * SHUDDER_GAP_S, rebound)
    return out


def scene():
    """All sources at one close microphone; only the hits get cabin reflections."""
    rub, hiss = sliding()
    opening = ramp(OPEN_S, OPENING_S)
    hits = rattles() + clicks() + knocks() + handle() + pings() + shudder(count=3)
    hits = cabin(hits, t60_s=0.024, wet_db=-20.5)
    clothes = cloth(rub, hiss) + clothing_ticks(hiss, count=4) + squeaks() + scuffs() + creaks(count=12)
    return (air(opening) + clothes + rumble(rub) + hits + booms())[None]


def record(dry):
    """The microphone rounds off the highest peaks; then the band limit."""
    ceiling = 0.73
    rounded = ceiling * np.tanh(dry / ceiling)
    lowpass = signal.firwin(601, EDGE_HZ, window=("kaiser", 8), fs=SR)
    return signal.oaconvolve(rounded, lowpass[None], "same")


dry = scene()
out = record(dry)
wav_out(out)
```